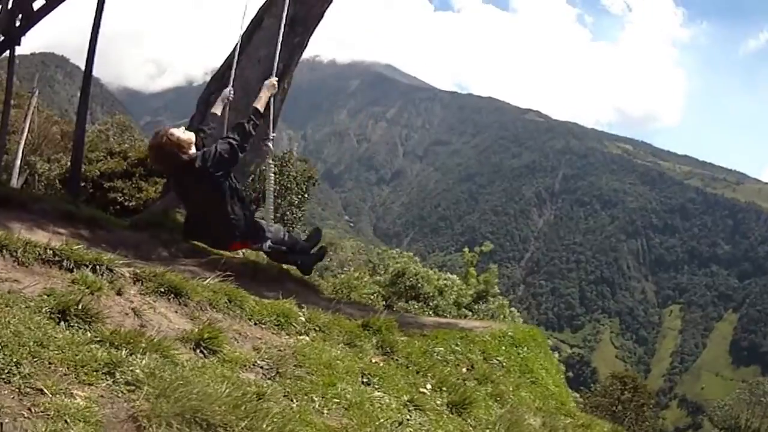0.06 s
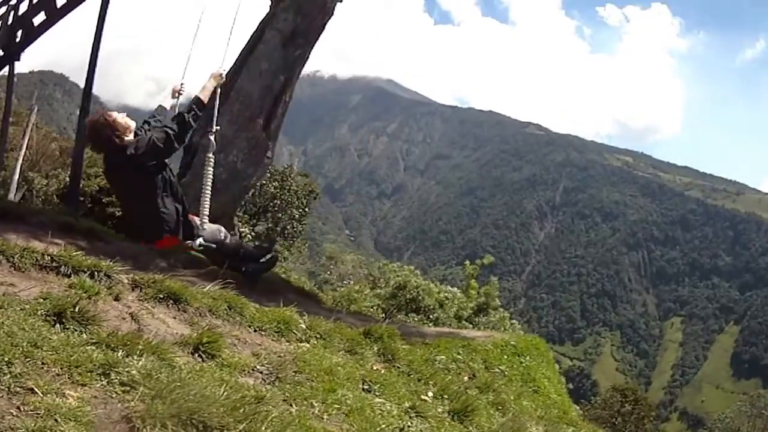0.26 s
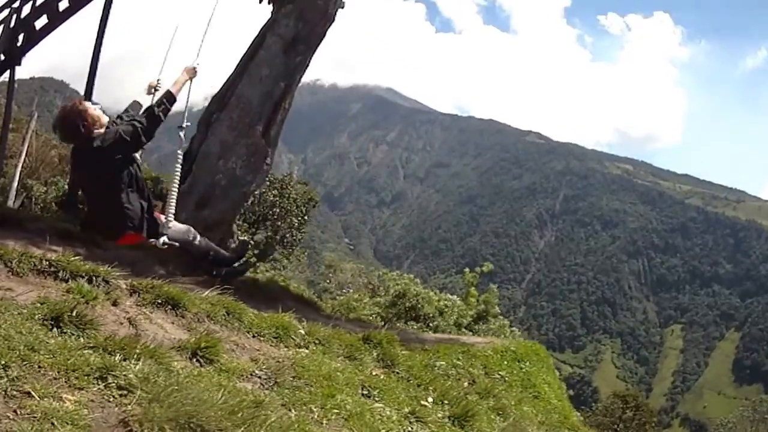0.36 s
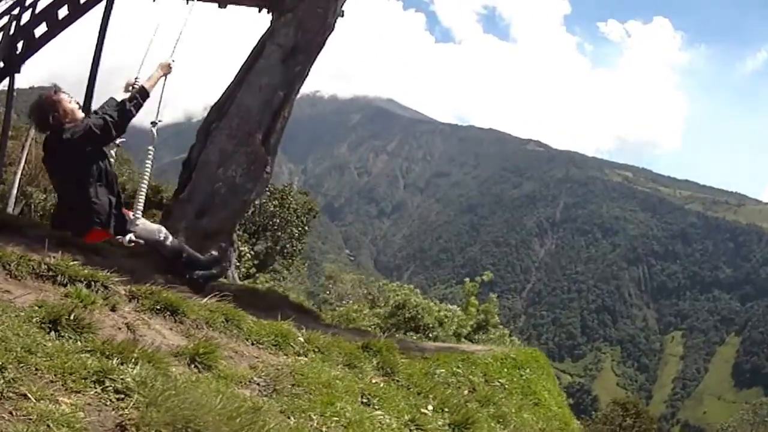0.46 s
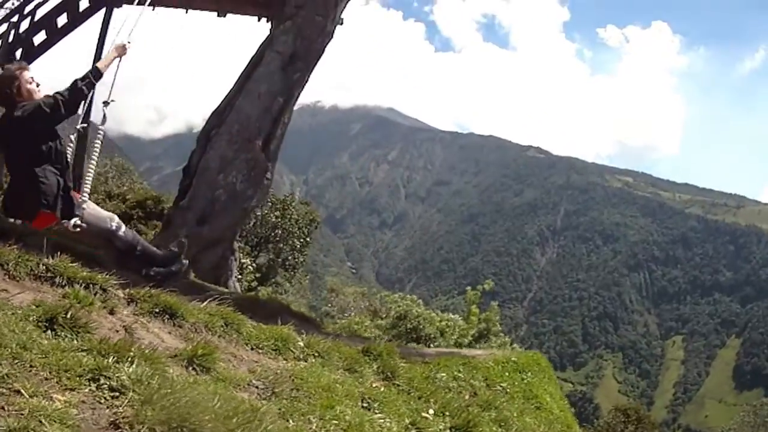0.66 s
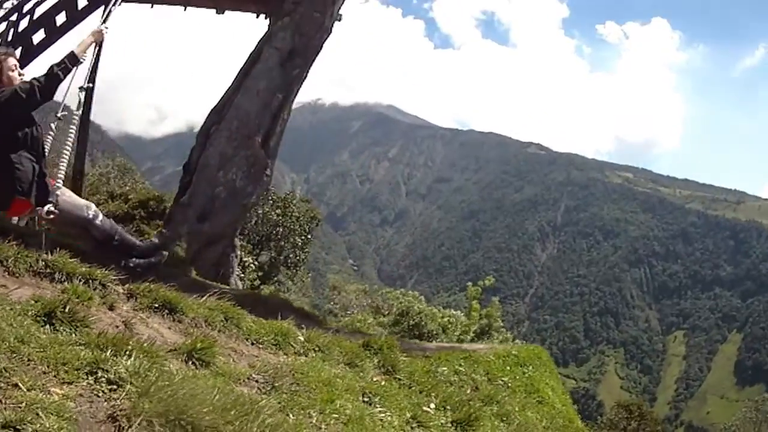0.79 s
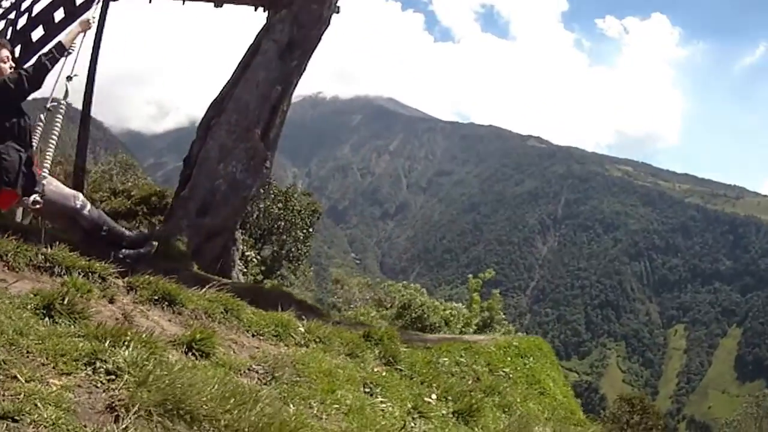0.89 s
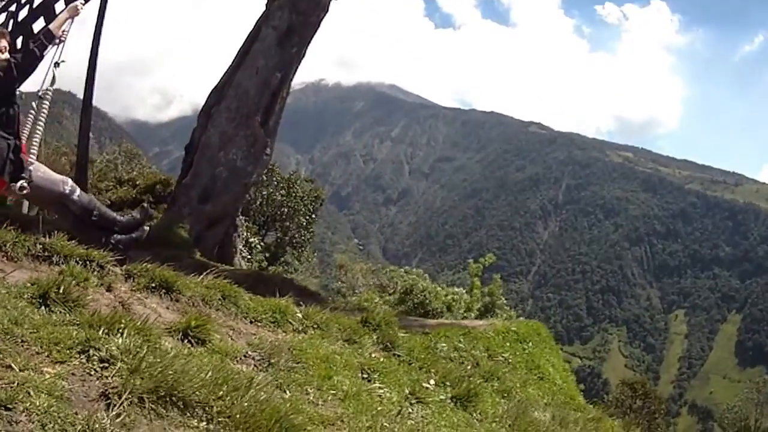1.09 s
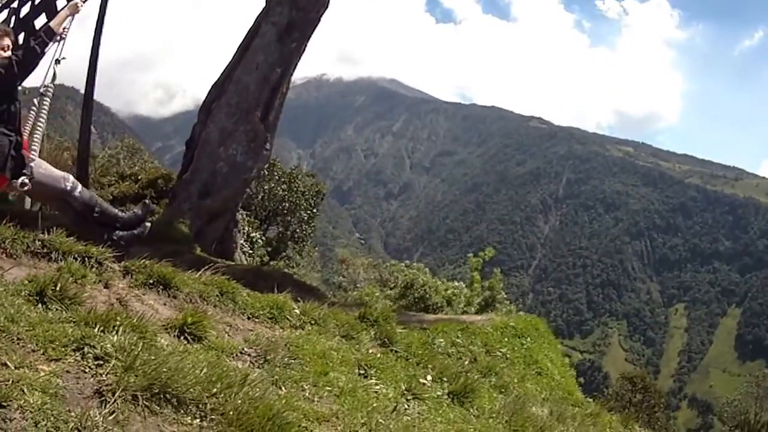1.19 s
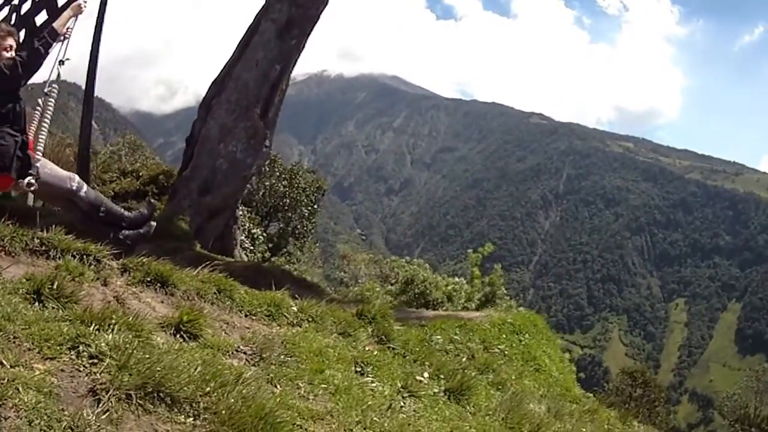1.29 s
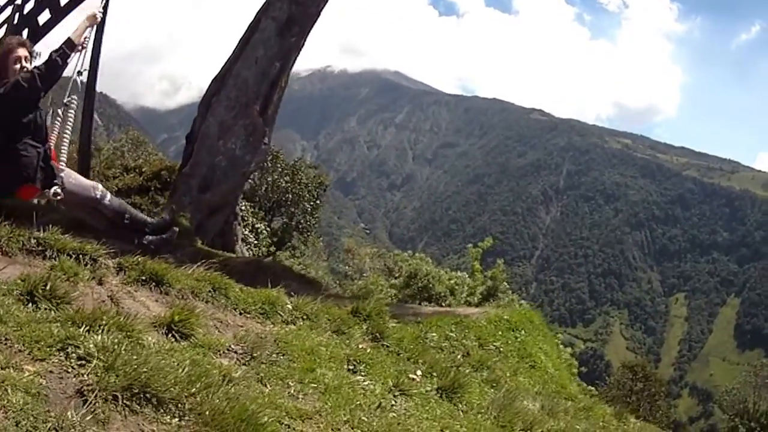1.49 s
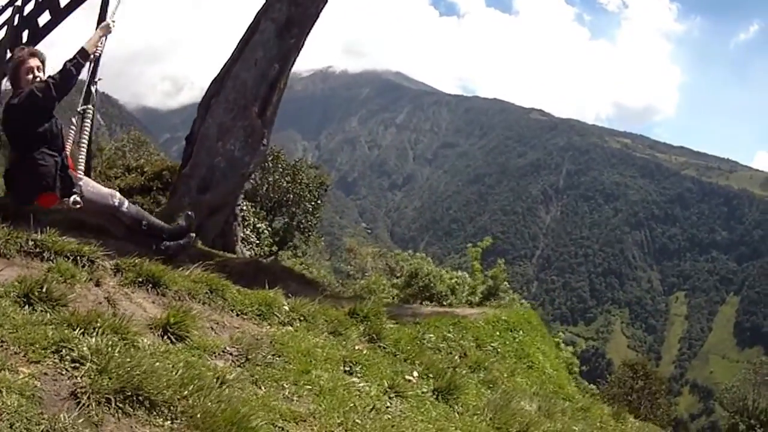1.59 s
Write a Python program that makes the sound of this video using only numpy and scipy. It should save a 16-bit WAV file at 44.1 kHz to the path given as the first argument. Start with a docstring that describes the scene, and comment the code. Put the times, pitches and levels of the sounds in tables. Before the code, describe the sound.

A few dry, hollow knocks sound close to the microphone, mixed with brief creaks and a lighter clack. Light wind hisses steadily on an open hillside, and a weak gust rumbles as a rope swing goes by.

```python
"""The camera's mount or housing gives a few dry, hollow knocks close to the microphone.
Among them come a lighter clack and creaks: short runs of slips that rub and ring small bright modes.
Behind them lies the steady hiss of light wind on an open hillside.
A weak gust rumbles as a rope swing goes by."""
import sys
import numpy as np
from scipy import signal
from scipy.fft import rfft, irfft
from scipy.io import wavfile
from scipy.ndimage import uniform_filter1d

SR = 44100
rng = np.random.default_rng(int(sys.argv[2]) if len(sys.argv) > 2 else 0)


def materialize(psi):
    """Save the field psi as 16-bit PCM at rate SR to the path in sys.argv[1].

    A 1-D psi becomes a single channel; in a 2-D psi each row is a channel.
    """
    bounded = np.clip(np.atleast_2d(psi).T, -1, 1)
    quanta = np.round(bounded * 32767).astype(np.int16)
    wavfile.write(sys.argv[1], SR, quanta)


N = 72765


def amp(db):
    """Decibels to gain."""
    return 10 ** (np.asarray(db) / 20)


def evened(x):
    """Scales to rms 1."""
    return x / np.sqrt(np.mean(x ** 2) + 1e-20)


def read(points, hz):
    """Reads a spectrum on a log-frequency axis."""
    f, value = np.transpose(points)
    return np.interp(np.log(hz + 1), np.log(f + 1), value)


def add(mix, s, sound):
    """Mixes a sound in at s seconds."""
    part = mix[round(s * SR):][:len(sound)]
    part += sound[:len(part)]


def pulse(points, size=2048):
    """A causal click with the given spectrum and a peak of 1."""
    log_gain = np.log(amp(read(points, abs(np.fft.fftfreq(size, 1 / SR)))))
    click = np.fft.ifft(np.exp(np.conj(signal.hilbert(log_gain)))).real[:size // 2]
    return click / abs(click).max()


def knock(register_db, tick_db, tilt_db_per_octave):
    """The camera's mount or housing knocks: a gritty tick, then a hollow ring that dies fast."""
    # Modes of the knocking part. Each row: pitch in Hz, level in dB, t60 in seconds, polarity.
    body_modes = [(262.7, -31.5, 0.15, 1), (317, -33, 0.17, -1), (375.6, -13, 0.02, -1),
                  (627, -28, 0.028, -1), (820, 9.5, 0.0029, 1), (966, -17.5, 0.061, 1),
                  (1172, 0, 0.016, -1), (1280, -23.5, 0.038, 1), (1555, 3.5, .016, -1),
                  (1925, 16, 0.00834, -1), (1931, 14, 0.011, 1), (2130, -14, 0.0095, 1)]
    # Where the low, middle, upper and top register gains apply, in Hz.
    register_hz = [407, 1050, 1550, 1800]
    # Colour of the contact tick. Each row: frequency in Hz, relative level in dB.
    tick_colour = [(100, -21), (300, -1.5), (1500, 6), (2200, 11), (2800, -9.5), (3300, 0.5), (3950, -1.5),
                   (4300, -5), (4750, -9.5), (5500, -13), (7000, -15.5), (8300, -29), (9100, -43),
                   (10200, -15.5), (10800, -23.5), (11600, -12), (12400, -24.5), (14000, -18), (15400, -22)]
    bloom_s, bass_cut_hz = 0.002, 145
    grit_t60, tilt_above_hz = 0.016, 3000
    t = np.arange(SR // 6) / SR
    strike = list(zip(register_hz, register_db))
    ring = np.zeros(len(t))
    for hz, db, t60, polarity in body_modes:
        ring += polarity * amp(db + read(strike, hz) - 60 * t / t60) * np.sin(2 * np.pi * hz * t)
    ring *= 1 - np.exp(-t / bloom_s)
    # The small part radiates little bass.
    ring = signal.lfilter(*signal.butter(2, bass_cut_hz, "high", fs=SR), ring)
    grit = 0.36 * rng.standard_normal(len(t)) * amp(-60 * t / grit_t60)
    grit[0] = 1  # the first contact
    tilted = [(hz, db + tilt_db_per_octave * np.log2(max(hz / tilt_above_hz, 1)))
              for hz, db in tick_colour]
    tick = signal.fftconvolve(grit, pulse(tilted))[:len(t)]
    return ring + amp(tick_db) * tick


def creaks():
    """Runs of uneven stick-slip clicks swell and fade, rubbing dryly and ringing small bright modes."""
    # Each row: peak time, rise and fall of a run in seconds, squeak gain in dB, rub gain in dB.
    runs = [(0.1277, 0.0012, 0.0022, -47, -38.5), (0.139, .002, 0.022, -58.5, -49.5),
            (0.2240, .005, .012, -57.5, -50), (0.25, 0.0052, 0.0082, -35, -47),
            (0.276, .002, 0.014, -44.5, -47), (0.3967, 0.0027, 0.0026, -33, -35.5),
            (0.4060, 0.0023, .010, -50.5, -49), (0.522, 0.0074, 0.0049, -56, -44.5),
            (0.537, 0.0026, 0.0077, -56, -41.5)]
    # Modes of the creaking part. Each row: pitch in Hz, level in dB, t60 in seconds.
    squeak_modes = [(1970, -10, .010), (2240, -3.5, 0.004), (3174, -8, 0.012), (3352, -5, 0.015),
                    (3540, -11.5, 0.0085), (5700, -18.5, 0.013)]
    # Colour of the dry rubbing. Each row: frequency in Hz, relative level in dB.
    rub_colour = [(80, -6), (300, 7), (1100, 0), (1800, 6.5), (2700, -9), (3400, -2), (4500, -1),
                  (6000, -11.5), (7200, -29), (9100, -41), (11000, -37), (15000, -19)]
    slips_per_s, jitter, spread_db, bloom_s = 1100, 0.5, 2, 0.00019
    t = np.arange(N) / SR
    timing, strength = rng.standard_normal((4000, 2)).T
    slip_at = np.round((np.arange(len(timing)) + jitter * timing) * SR / slips_per_s).astype(int)
    inside = (slip_at >= 0) & (slip_at < N)
    slips = np.bincount(slip_at[inside], amp(spread_db * strength[inside]), N)
    squeaking, rubbing = np.zeros((2, N))
    for peak_s, rise, fall, squeak_db, rub_db in runs:
        run = slips * np.exp(np.minimum((t - peak_s) / rise, (peak_s - t) / fall))
        squeaking += amp(squeak_db) * run
        rubbing += amp(rub_db) * run
    age = t[:SR // 10]
    ring = sum(amp(db - 60 * age / t60) * np.sin(2 * np.pi * hz * age) for hz, db, t60 in squeak_modes)
    ring *= 1 - np.exp(-age / bloom_s)
    return signal.fftconvolve(squeaking, ring)[:N] + signal.fftconvolve(rubbing, pulse(rub_colour))[:N]


def clack():
    """A lighter contact: a few milliseconds of grit with a fizzy top."""
    # Each row: frequency in Hz, relative level in dB.
    colour = [(80, -12), (250, -1.5), (600, -13), (1100, 3.5), (1550, 10), (2000, 8), (2800, -14.5),
              (4500, -12.5), (7000, -23), (9100, -48), (11500, -27), (13500, -14.5), (15400, -17.5)]
    grit_db, grit_t60 = -44, 0.026
    t = np.arange(SR // 10) / SR
    grit = rng.standard_normal(len(t)) * amp(grit_db - 60 * t / grit_t60)
    return signal.fftconvolve(grit, pulse(colour))


def gust():
    """Moving air rumbles in one low swell and softly buffets the microphone."""
    # Colour of the rumble. Each row: frequency in Hz, relative level in dB.
    colour = [(20, 2), (50, 3.5), (90, -3), (150, -5), (260, -1.5), (600, -25), (3000, -88)]
    # Buffets of air. Each row: peak time in seconds, half-width in seconds, level in dB.
    puffs = [(0.495, 0.0037, -57), (0.58, 0.013, -54), (0.705, 0.0086, -63)]
    peak_s, half_width_s, swell_db = 0.56, 0.34, -68.5
    t = np.arange(N) / SR
    rumble = irfft(rfft(rng.standard_normal(N)) * amp(read(colour, np.fft.rfftfreq(N, 1 / SR))), N)
    swell = amp(swell_db) * np.exp(-((t - peak_s) / half_width_s) ** 2)
    buffets = sum(amp(db) * np.exp(-((t - s) / half_width) ** 2) for s, half_width, db in puffs)
    return evened(rumble) * (swell + buffets)


def wind():
    """Light wind: a wide hiss with faint drifting patches of colour and a slight, slow swell."""
    # Colour of the hiss, dipping near 9 kHz. Each row: frequency in Hz, relative level in dB.
    colour = [(15, -35), (25, -9), (66, -5), (116, -16), (288, -5), (388, -6.5), (521, -3), (993, -4.5),
              (1080, -3.5), (1170, -5.5), (1890, -6), (2280, -9), (5700, -20), (7660, -28.5), (9000, -39.5),
              (11200, -26), (15400, -17)]
    level_db, patch_db, swell_db = -56, 0.76, -0.2
    frames, hz = N // 256 + 5, np.fft.rfftfreq(1024, 1 / SR)
    real, imag, patches = rng.standard_normal((3, frames, len(hz)))
    patches = uniform_filter1d(patches, size=12, axis=0)  # smooth in time
    patches = evened(uniform_filter1d(patches, size=12, axis=1))  # and in frequency
    swell = evened(uniform_filter1d(rng.standard_normal(frames), size=50))[:, None]
    spectra = (real + 1j * imag) * amp(read(colour, hz) + patch_db * patches + swell_db * swell)
    hiss = signal.istft(spectra.T, nperseg=1024, noverlap=768)[1][:N]
    return amp(level_db) * evened(hiss)


def scene():
    """Knocks, creaks and a clack over the wind, dry in the open air."""
    # Each row: start in seconds, gains of the low, middle, upper and top registers in dB,
    # tick gain in dB, treble tilt of the tick in dB per octave.
    knocks = [(0.2483, -13.5, -15.5, -14.5, -15.5, -37, -1.4), (0.4334, -11.5, -8.5, -7, -5.6, -26.5, 1),
              (0.7899, -25, -21, -26.5, -19, -36, -2.3), (0.8317, -26, -33.5, -41, -40.5, -46.5, 0.79),
              (1.3390, -22.5, -34, -34, -27.7, -43, -2)]
    mix = wind() + gust() + creaks()
    for start_s, *register_db, tick_db, tilt in knocks:
        add(mix, start_s, knock(register_db, tick_db, tilt))
    add(mix, s=0.5546, sound=clack())
    return mix[None]


def record(dry):
    """The microphone's narrow treble dip, then a steep cut of the very top."""
    dip_hz, top_hz = 9150, 15380
    heard = signal.lfilter(*signal.iirnotch(dip_hz, Q=16, fs=SR), dry)
    lowpass = signal.firwin(801, top_hz, window=("kaiser", 8), fs=SR)
    return signal.oaconvolve(heard, lowpass[None], "same")


dry = scene()
out = record(dry)
materialize(out)
```